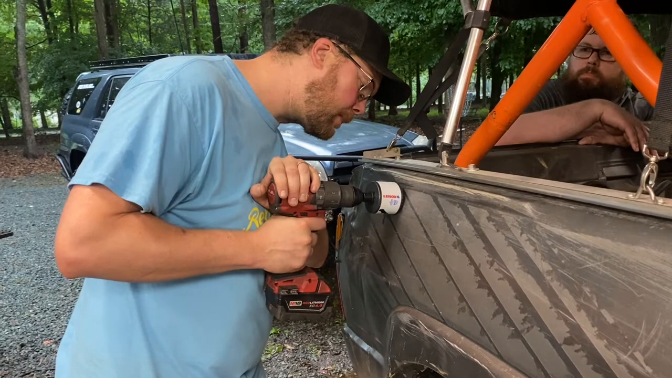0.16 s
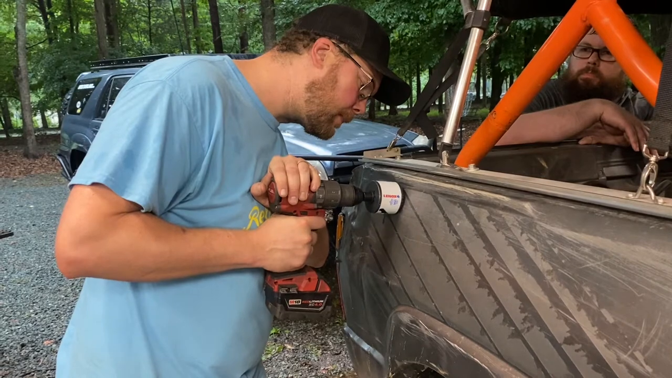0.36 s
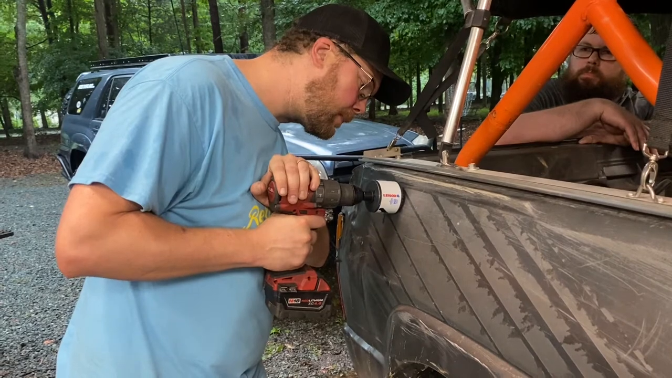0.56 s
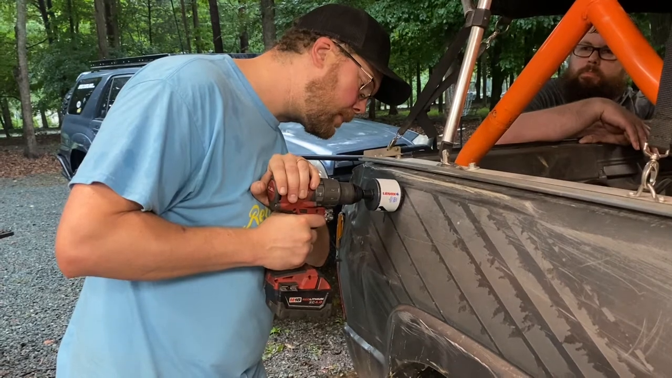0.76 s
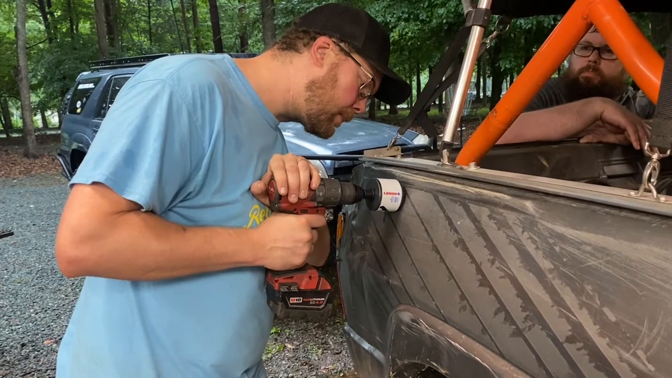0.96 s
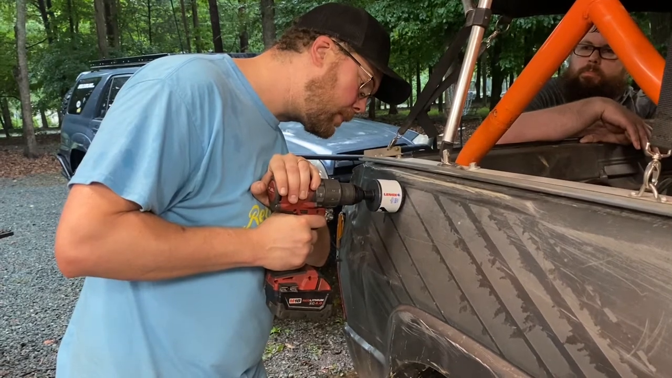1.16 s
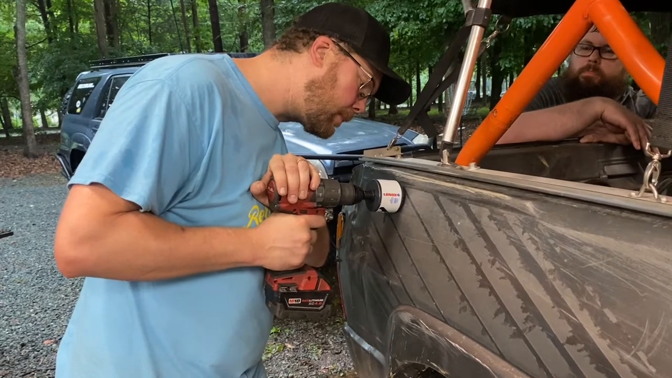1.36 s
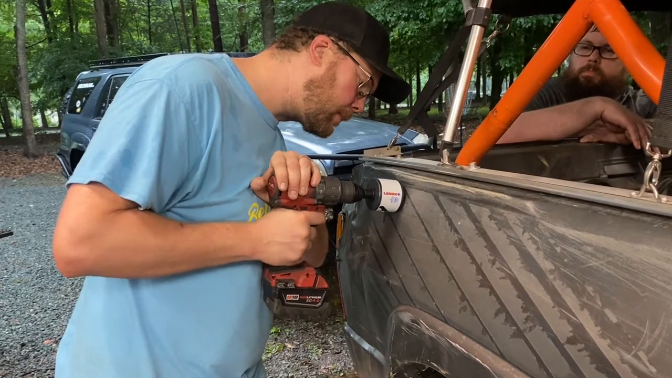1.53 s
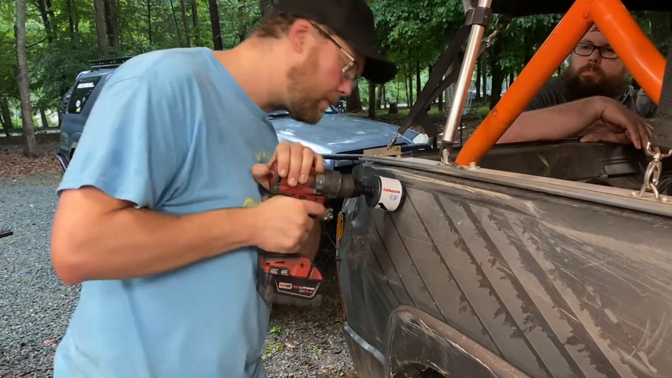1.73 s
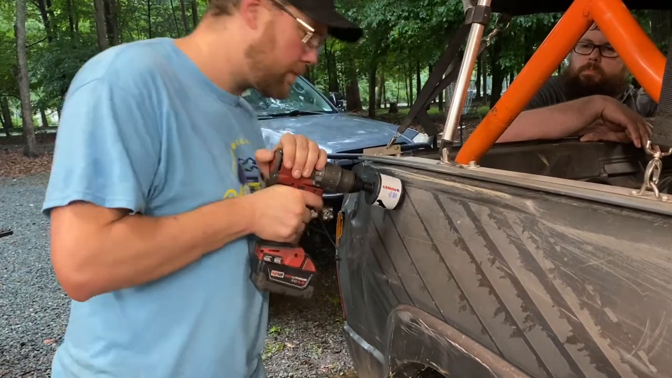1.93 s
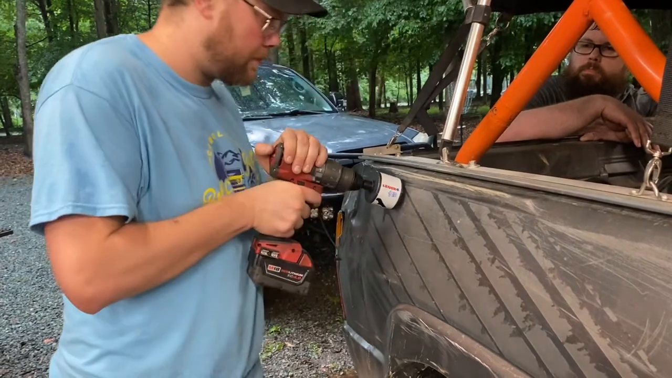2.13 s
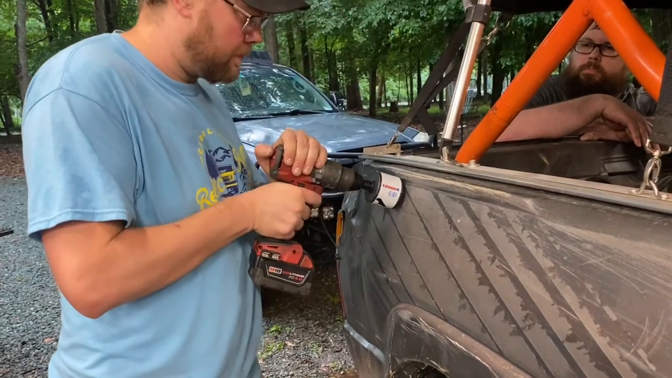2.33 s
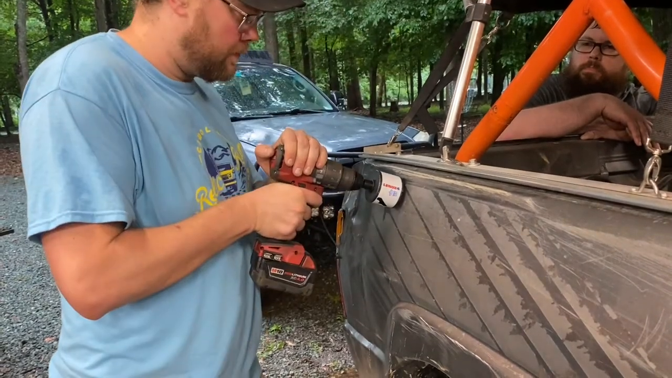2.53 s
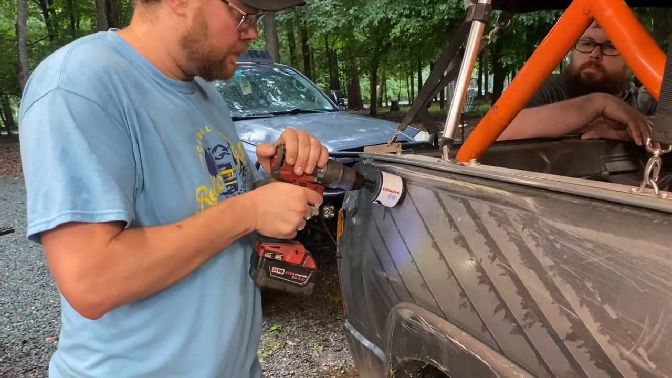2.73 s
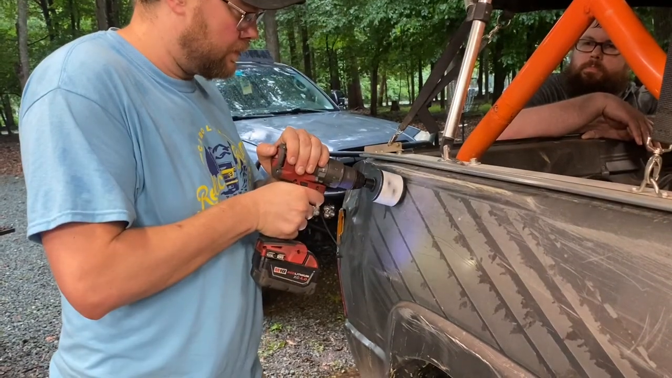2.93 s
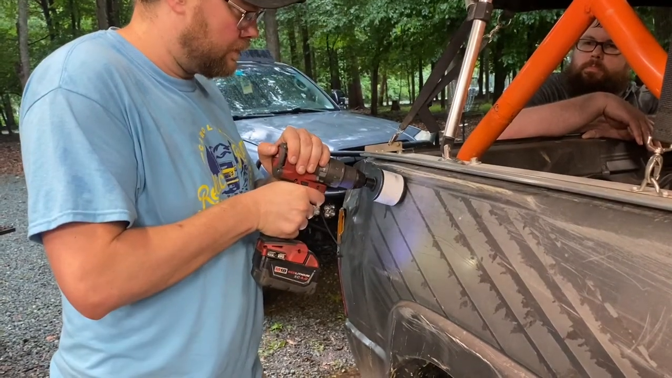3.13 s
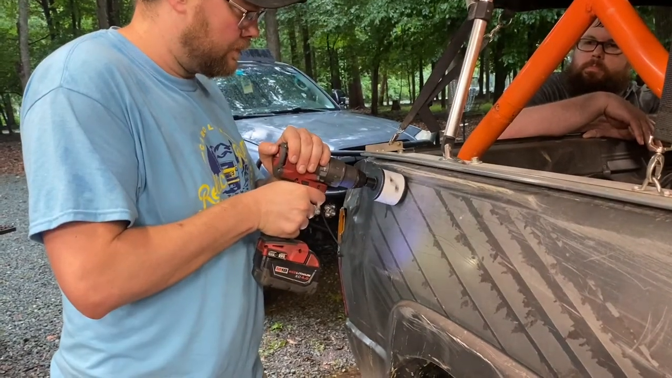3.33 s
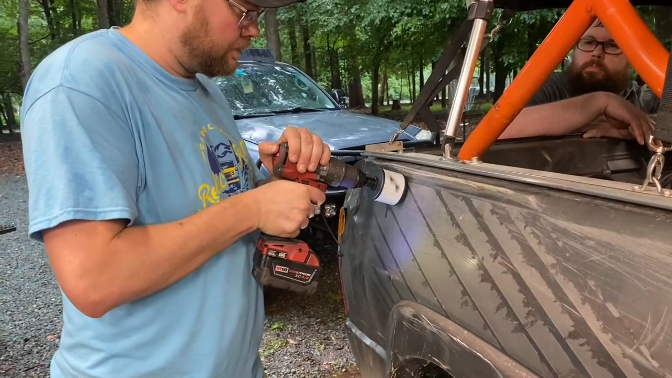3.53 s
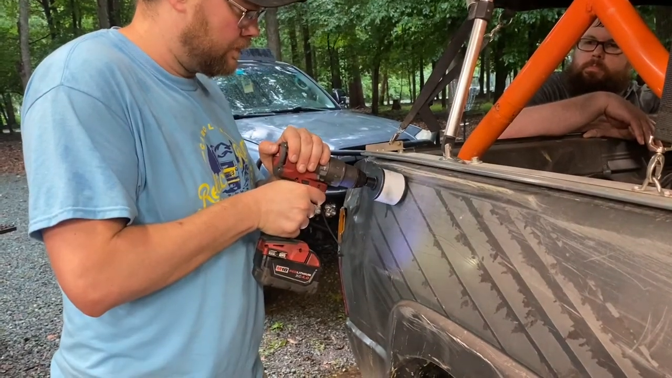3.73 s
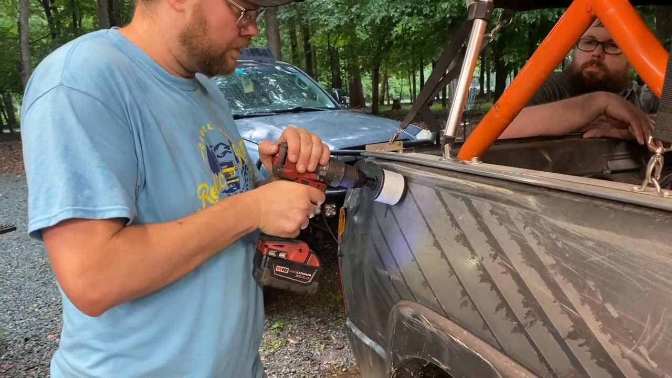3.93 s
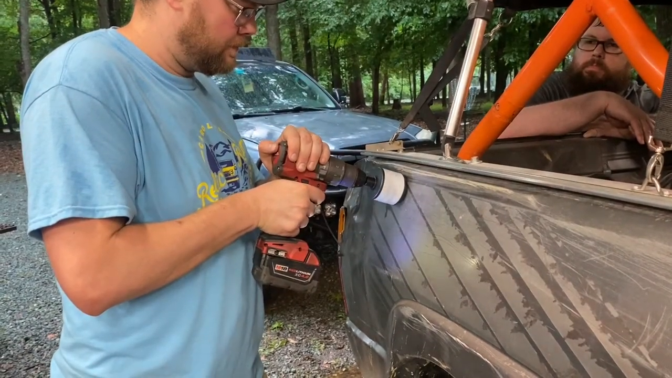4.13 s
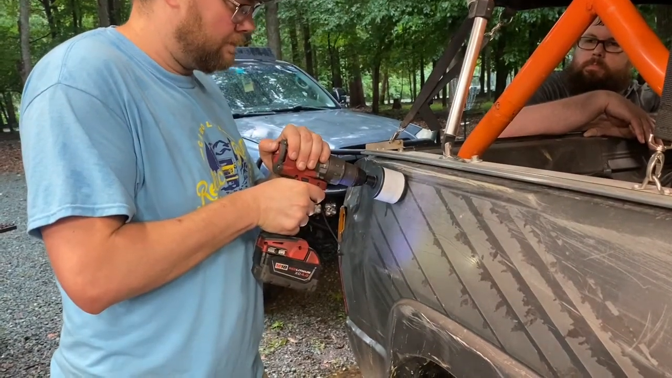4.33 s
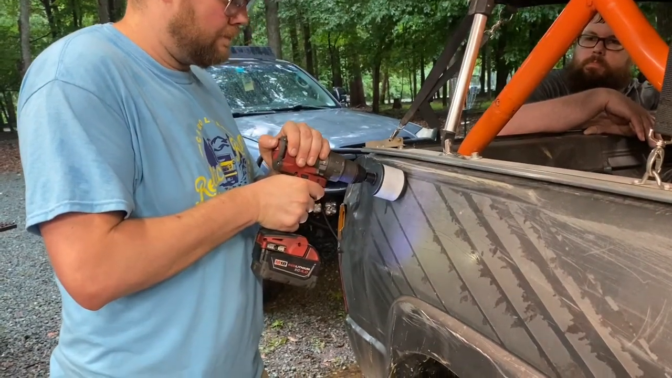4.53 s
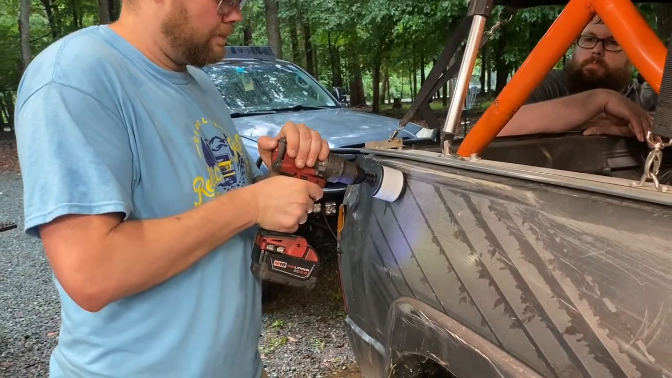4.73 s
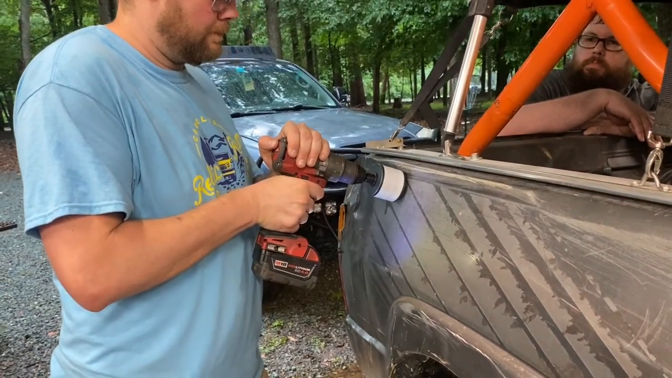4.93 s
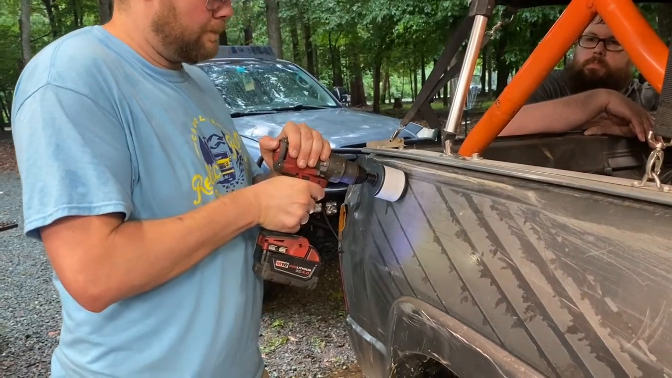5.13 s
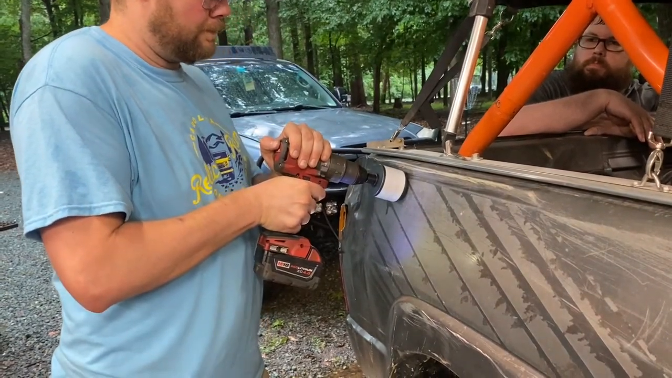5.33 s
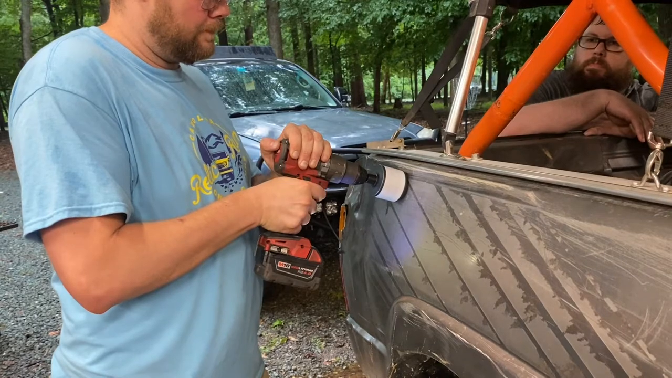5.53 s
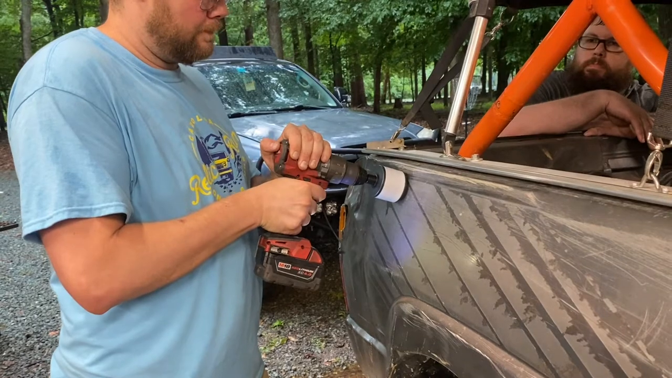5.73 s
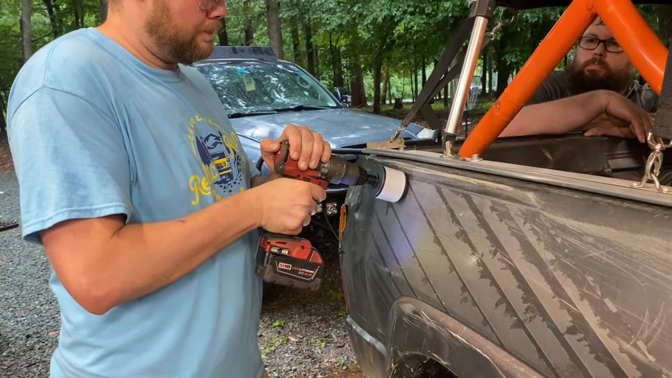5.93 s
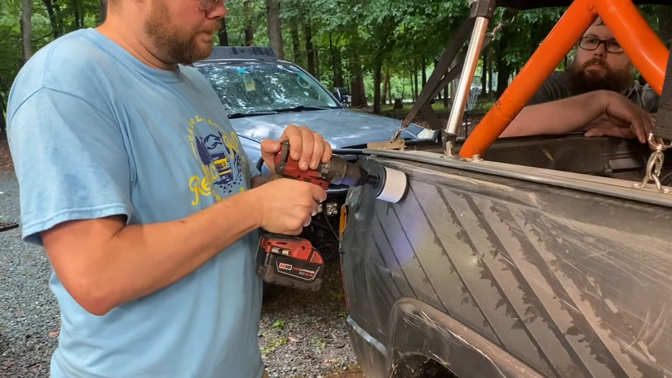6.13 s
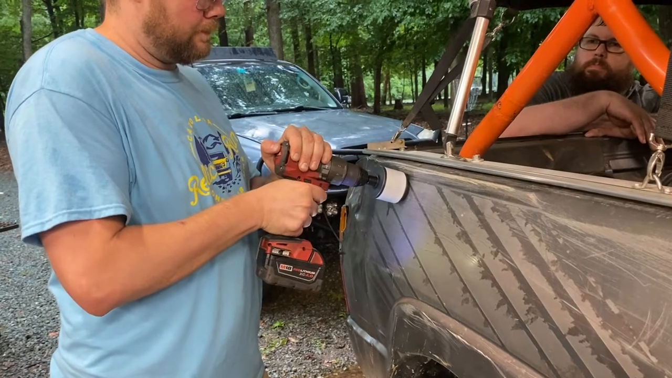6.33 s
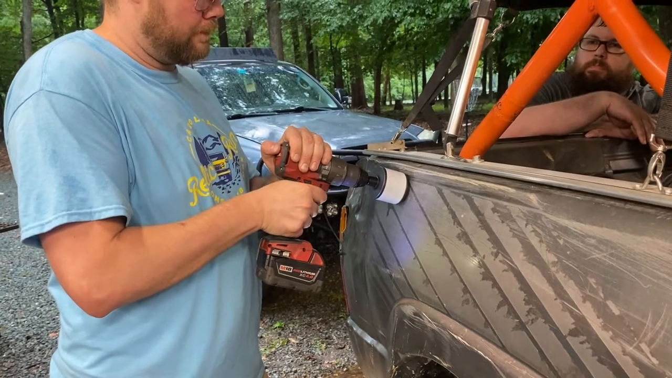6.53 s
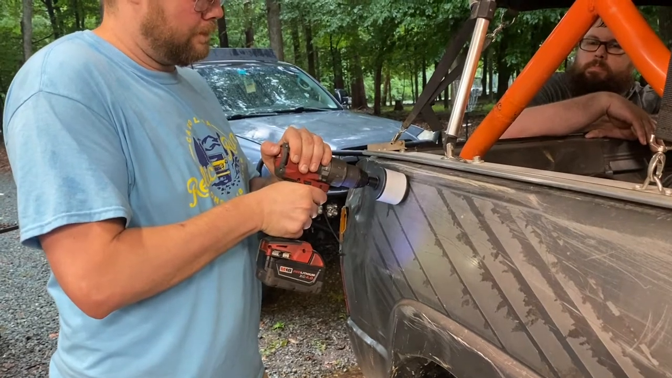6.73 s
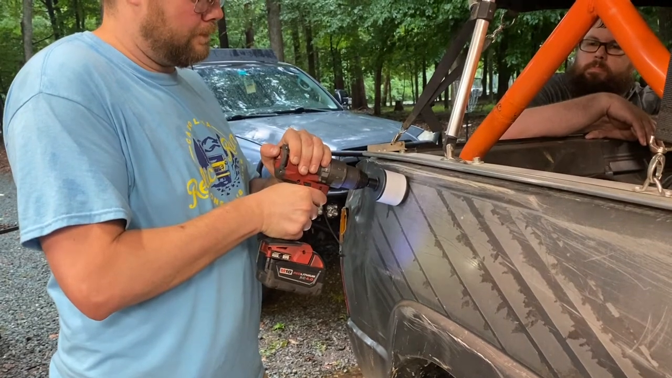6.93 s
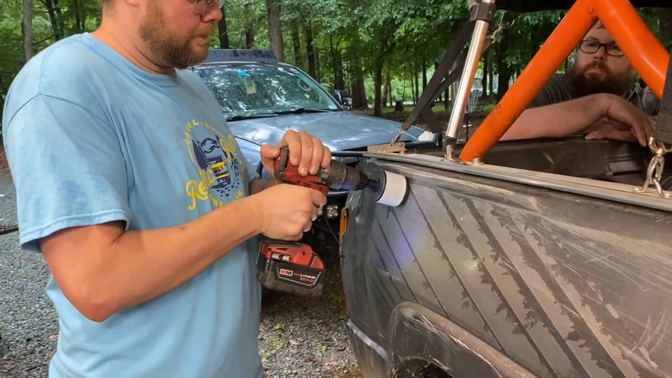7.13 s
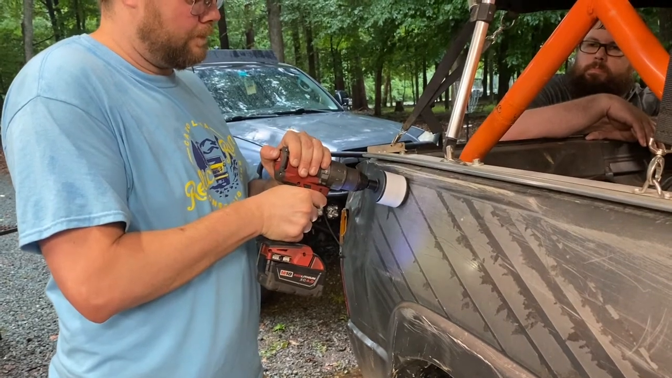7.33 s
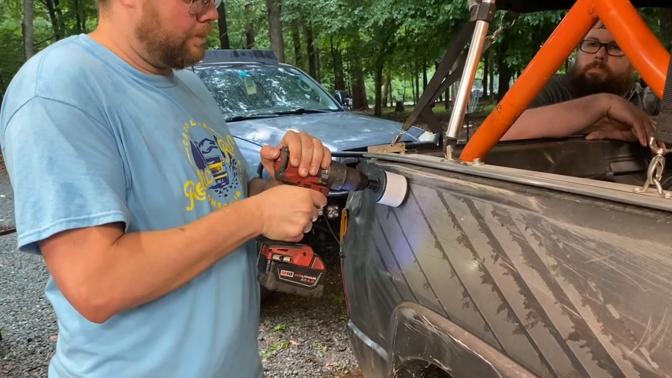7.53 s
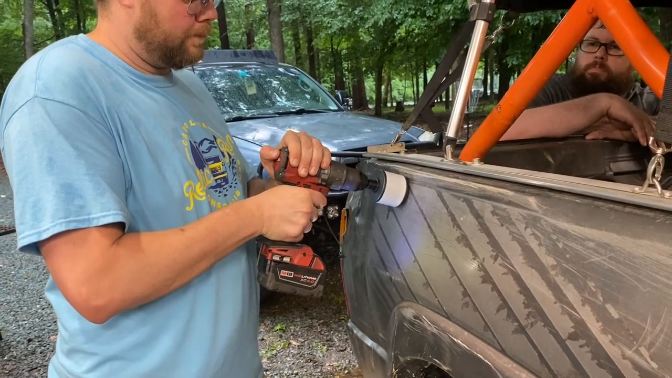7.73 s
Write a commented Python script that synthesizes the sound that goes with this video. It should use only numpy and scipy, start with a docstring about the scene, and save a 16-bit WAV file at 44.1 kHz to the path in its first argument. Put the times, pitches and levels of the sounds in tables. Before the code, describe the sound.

Outdoors, a low machine rumble runs alone, then a cordless drill's hole saw knocks, grinds and speeds into a loud ringing chatter through sheet steel.

```python
"""Outdoors beside a vehicle: a cordless drill drives a hole saw into a steel side panel, a metre or two from a
phone. The teeth knock one by one while the spindle is slow, then skip and chatter at full speed. Tooth blows
excite the panel's damped modes; tearing metal and chips excite the saw cup; gear tones whine in ratio to the
spindle. A low machine rumble of coloured noise runs throughout; the background level drops once the drill is
under way."""
import sys
import numpy as np
from scipy import signal
from scipy.fft import rfft, irfft, next_fast_len
from scipy.io import wavfile
from scipy.ndimage import uniform_filter1d

SR = 44100
rng = np.random.default_rng(int(sys.argv[2]) if len(sys.argv) > 2 else 0)


def to_linear_factor(level_db):
    """Convert decibel levels (scalar or array-like) to linear amplitude factors."""
    exponent = np.asarray(level_db, float) / 20
    return 10 ** exponent


def wav_record(signal):
    """Record a signal, one row per channel, as 16-bit PCM in the file named by sys.argv[1]."""
    frames = np.transpose(np.atleast_2d(signal))
    bounded = np.clip(frames, -1, 1)
    # unit amplitude maps onto the largest positive 16-bit level
    quanta = np.round(bounded * 32767).astype(np.int16)
    wavfile.write(sys.argv[1], SR, quanta)


N = 342657
TIME, SIZE = np.arange(N) / SR, next_fast_len(N + SR)
HZ = np.fft.rfftfreq(SIZE, 1 / SR) + 1e-3  # kept off zero for the logarithms and divisions
TEETH = 12
# the cup seats in its groove around this time
SEATS_S, SEAT_LENGTH_S = 5.38, 0.17


def unit(x):
    """Normalisation to an rms of 1."""
    return x / np.sqrt(np.mean(x ** 2))


def over_hz(table):
    """Spectral envelope: interpolates (pitch_hz, value) rows on a log-frequency axis."""
    hz, value = np.transpose(table)
    return np.interp(np.log(HZ), np.log(np.maximum(hz, 1)), value)


def modes(table):
    """Modal superposition: sums damped resonators, neighbours in opposite phase."""
    response = 0
    for k, (hz, width_hz, level_db) in enumerate(table):
        damping = 1j * width_hz * HZ
        response = response + (-1) ** k * to_linear_factor(level_db) * damping / (hz ** 2 - HZ ** 2 + damping)
    return response


def through(x, response):
    """Linear filtering: multiplies the spectrum by a frequency response."""
    return irfft(rfft(x, SIZE) * response, SIZE)[..., :N]


def clicks(start_s, size):
    """Impulsive excitation: one weighted sample at each time."""
    return np.bincount(np.clip((start_s * SR).astype(int), 0, N - 1), size, N)


def decaying(x, decay_s):
    """Exponential relaxation: each input sample dies away with this time constant."""
    return signal.lfilter([1], [1, -np.exp(-1 / (decay_s * SR))], x)


def walk(rate):
    """Slow random modulation: normal levels held 1 / rate s, then smoothed twice."""
    k = int(SR / rate)
    held = np.repeat(rng.standard_normal(N // k + 1), k)
    return uniform_filter1d(uniform_filter1d(held, k), k)[:N]


def bump(peak_s, before_s, after_s):
    """Bell envelope of height 1, with its own rise and fall."""
    return np.exp(-((TIME - peak_s) / np.where(TIME < peak_s, before_s, after_s)) ** 2)


# broad colour of the rumble: pitch_hz, relative level_db
RUMBLE_COLOUR = [(30, -11), (64, 1.5), (138, -4), (180, -5.5), (436, -6.5), (968, -9.5), (1380, -17),
                 (6000, -32), (8200, -40), (11000, -44), (16000, -52)]
# humps on that colour: pitch_hz, width_hz, level_db over the colour
HUMS = [(64.9, 4.2, 9.8), (78, 2.5, 1.3), (132.8, 4.4, 11.3), (439.8, 2, 14.7)]
# stereo width of the rumble: pitch_hz, side minus mid level_db
WIDTH = [(60, -17.5), (300, -7), (1300, -1), (3900, -4.5), (5500, 0), (6800, -33)]
# band that comes in uneven puffs: pitch_hz, width_hz, level_db under the rest of the rumble
PUFF = [(307, 31, -16)]


def rumble():
    """Broadband noise: a running machine some way off, with a few humps and nearly mono bass."""
    level_db, sink_db, sink_from_s, sink_to_s = -29.5, -15.5, 2.8, 5.2
    left_minus_right_db, puff_swing_db = -0.6, 8.5
    colour = to_linear_factor(over_hz(RUMBLE_COLOUR)) * (1 + np.abs(modes(HUMS)))
    shapes = colour * np.array([HZ ** 0, to_linear_factor(over_hz(WIDTH))])
    mid, side = through(rng.standard_normal((2, N)), shapes)
    sinking_db = np.interp(TIME, (sink_from_s, sink_to_s), (0, sink_db))
    gain = to_linear_factor(level_db + sinking_db + 0.5 * walk(7.9)) / np.std(mid)
    puff_noise = unit(through(rng.standard_normal(N), modes(PUFF) ** 2))
    puffs = to_linear_factor(PUFF[0][2] + puff_swing_db * walk(9.0)) * puff_noise
    mid = mid + np.std(mid) * puffs
    pan = to_linear_factor(left_minus_right_db / 2)
    return gain * np.array([(mid + side) * pan, (mid - side) / pan])


def knocks(table, response, decay_s):
    """Impact excitation: short noise bursts into a ringing body, each scaled to its peak."""
    burst = np.exp(-TIME / decay_s) * rng.standard_normal(N)
    blow = through(burst, response)[:SR // 4]
    start_s, peak_db = np.transpose(table)
    return signal.fftconvolve(clicks(start_s, to_linear_factor(peak_db)), blow / np.abs(blow).max())[:N]


# faint ticks before the drill starts: start_s, peak_db
TICKS = [(0.6679, -35), (1.4646, -40), (2.6174, -36)]


def ticks():
    """Impact noise: faint, short bursts with the colour of the cup's hiss."""
    return knocks(TICKS, to_linear_factor(over_hz(HISS)), 0.015)


# switching tones of the speed controller: pitch_hz, peak level_db before the throb
SWITCH = [(7830, -51), (15660, -57)]


def controller():
    """Amplitude modulation: the switching tones throb while the trigger is part pressed."""
    on_s, off_s = 2.608, 4.4
    gate = (TIME > on_s) & (TIME < off_s)
    throb = to_linear_factor(1.4 * walk(26.0))
    return gate * throb * sum(to_linear_factor(db) * np.sin(2 * np.pi * hz * TIME) for hz, db in SWITCH)


# gear and motor tones: multiple of spindle speed, rms level_db before the cup seats, level_db after
WHINE = [(6.11, -41, -31), (7.96, -39, -26), (16.09, -41.5, -37), (24.26, -39, -38.5),
         (32.08, -38.5, -40.5)]


def whine(tooth_hz, speed, cutting):
    """Order-locked tones: gears and motor sound at fixed multiples of the wavering spindle speed."""
    waver_share, waver_db = 0.0068, 2.5
    turns = np.cumsum(tooth_hz * (1 + waver_share * walk(25))) / SR / TEETH
    out = np.zeros(N)
    for multiple, *levels_db in WHINE:
        level_db = np.interp(TIME, (SEATS_S, SEATS_S + 2 * SEAT_LENGTH_S), levels_db)
        out += to_linear_factor(level_db + waver_db * walk(9)) * np.sin(2 * np.pi * multiple * turns)
    return np.sqrt(2) * out * speed ** 10 * cutting


# single teeth ping the cup: start_s, initial level_db, pitch_hz
PINGS = [(2.8826, -14, 7570), (2.9221, -14, 7585), (3.0145, -13, 7670), (3.0608, -9.5, 7600),
         (2.8617, -13, 11000), (3.2044, -18, 11190), (5.1156, -12, 11100), (5.3954, -17, 11150),
         (5.8484, -14, 10970), (4.1902, -17, 7850), (5.02, -10.5, 7920), (5.7874, -12, 7970),
         (5.9822, -13.5, 7660)]


def pings():
    """Free vibration: the struck cup rings in short decaying sines."""
    decay_s = 0.0032
    out, t = np.zeros(N + SR), TIME[:SR // 20]
    for start_s, level_db, pitch_hz in PINGS:
        ping = to_linear_factor(level_db) * np.exp(-t / decay_s) * np.sin(2 * np.pi * pitch_hz * t)
        out[int(start_s * SR):][:len(t)] += ping
    return out[:N]


# first blows as the slack is taken up: start_s, peak_db
CATCH = [(2.718, -8), (2.753, -7)]


def first_blows():
    """Impulse response of the steel: noisy blows excite panel, hole edge and cup together."""
    steel = modes(PANEL) / 2 + modes(BOOM) * to_linear_factor(4.5) + 2 * modes(EDGE)
    steel = steel + modes(CUP) * to_linear_factor(-12.5) + to_linear_factor(over_hz(SCRAPE) - 11.0)
    return knocks(CATCH, steel, 0.0093)


# the spindle hunts and climbs: start_s, tooth_rate_hz
CLIMB = [(2.74, 55.98), (2.78, 60.2), (2.832, 84.28), (2.868, 93.73), (2.916, 100.1), (3.056, 109.7),
         (3.112, 107), (3.206, 89.43), (3.47, 77.58), (3.588, 83.82), (3.718, 111.9), (3.936, 152.8),
         (4.08, 204.1), (4.308, 254.6), (4.51, 315.5), (4.6, 327.7)]
# then runs at full speed: start_s, tooth_rate_hz
FULL = [(4.68, 345.), (5.45, 345.), (5.75, 341.), (7.77, 339.)]
# skipping grows with speed: tooth_rate_hz, share of teeth that skip (0-1)
SKIP_BY_RATE = [(260, .02), (305, .12), (322, .3), (331, .9)]


def spindle():
    """Rotational kinematics: tooth rate, speed relative to the final speed, and share of skipping teeth."""
    tooth_hz = np.interp(TIME, *np.transpose(CLIMB + FULL))
    skip = np.interp(tooth_hz, *np.transpose(SKIP_BY_RATE))
    return tooth_hz, tooth_hz / tooth_hz[-1], skip


# uneven rim (run-out, tooth groups, alternate set): times a turn, swing_db (scaled by twice the skip share)
RIM = [(1, 0.5), (4, 1), (6, 1)]


def tooth_blows(tooth_hz, skip, cutting):
    """Periodic impact with jitter: one blow a tooth, and a decaying burst of tearing after each."""
    teeth = np.cumsum(tooth_hz * cutting) / SR
    k = np.arange(1, int(teeth[-1]))
    chance = rng.standard_normal((3, len(k)))
    slip = np.interp(k, teeth, skip)
    # a skipping saw lands off the beat, and the taller teeth take the load
    start_s = np.interp(k + (0.012 + 0.3 * slip) * chance[0], teeth, TIME)
    rim_db = sum(db * np.cos(2 * np.pi * order * k / TEETH) for order, db in RIM)
    bite = to_linear_factor(2 * slip * rim_db + (1.5 + 0.8 * slip) * chance[1])
    bite = bite / np.sqrt(uniform_filter1d(bite ** 2, size=4 * TEETH))
    # a missed tooth lets the panel spring back, so the mean push fades
    blows = -clicks(start_s, bite - slip) / np.sqrt(tooth_hz)
    tear = decaying(clicks(start_s, bite * to_linear_factor(2.0 * chance[2])) / np.sqrt(tooth_hz), 0.0025)
    return unit(blows), tear


# low panel modes: pitch_hz, width_hz, relative level_db
BOOM = [(137.8, 5.9, 5), (172.6, 21.7, 4.5), (205.2, 32.4, 8), (235.7, 5.3, -4.5), (263, 11.3, 2.5),
        (332, 7, 3)]
# the whole panel sways under steady bites: pitch_hz, width_hz, relative level_db
SWAY = [(78.2, 6.3, 1), (262, 253, -4), (730, 1500, -23)]


def panel_boom(blows, skip, rub, noise):
    """Forced plate vibration: blows and rubbing drive the low modes, which radiate little in the deep bass."""
    radiates_hz, seat_db = 118, -8.5
    force = blows + to_linear_factor(-6.0) * skip * rub * noise
    radiation = 1 + (radiates_hz / HZ) ** 8
    low, high = through(force, np.array([modes(BOOM[:4]), modes(BOOM[4:])]) / radiation)
    # the seated cup holds down the two highest low modes
    seated = to_linear_factor(seat_db * np.clip((TIME - SEATS_S) / SEAT_LENGTH_S + 0.5, 0, 1))
    sway = through((1 - skip) ** 2 * blows, modes(SWAY))
    return unit(low + seated * high + sway)


def cutting_grit(blows, tear, rub, skip, speed, noise):
    """Contact-time low-pass: lasting blows lose treble; tearing and rubbing noise add to them."""
    contact_s, clean_db, soften_db = 0.00036, 20.5, -6.5
    steady_rub_db, steady_tear_db, hiss_from_hz = 8, 2.5, 900
    # steady bites are cleaner blows than skipping ones; all soften as the saw speeds up
    contact = to_linear_factor(clean_db * (1 - skip)) * decaying(blows, contact_s) / (contact_s * SR)
    tearing = to_linear_factor(9.0 - steady_tear_db * (1 - skip)) * unit(tear * noise[0])
    rubbing = to_linear_factor(11.0 - steady_rub_db * (1 - skip)) * rub * noise[1]
    rough = tearing + rubbing
    # under steady bites the tearing and rubbing keep mostly to the treble
    deep = through(rough, 1 / (1 + (HZ / hiss_from_hz) ** 4))
    return to_linear_factor(soften_db * speed) * contact + rough - 0.7 * (1 - skip) * deep


# upper panel modes: pitch_hz, width_hz, relative level_db
PANEL = [(379.8, 9.7, 1), (534, 16, -5), (632.5, 29, 0.5), (709, 24.5, 1), (805, 11, -11), (912.3, 8.4, -1),
         (1660, 51, -4), (1860, 13.3, 9), (2131, 11.8, 5), (2445, 23, 2), (2725, 12.5, -2), (3525, 22, 0.5),
         (3947, 30, -6), (4880, 17.5, 4)]
# broad colour between the panel modes: pitch_hz, relative level_db per Hz
SCRAPE = [(300, -4.5), (600, 3.5), (1000, -2.5), (1500, 4.5), (2500, 0.5), (4500, -0.5), (6200, -8),
          (9000, -8.5)]
# slow teeth rasp through a wide band: pitch_hz, width_hz, level_db over the feed, before the speed fade
RASP = [(2530, 470, -5.5)]
# one panel mode sings as the speed settles: pitch_hz, width_hz, level_db over the feed at its peak
SING = [(1869, 41, -4)]


def panel_scrape(grit, speed):
    """Modal density: distinct upper modes stand over the diffuse ring of the sheet's many small ones."""
    sheet_t60_s, sheet_db = 0.13, -0.5
    tail = rng.standard_normal(SR // 2) * to_linear_factor(-60 * TIME[:SR // 2] / sheet_t60_s)
    sheet = rfft(unit(tail), SIZE) / np.sqrt(SR // 2)
    panel = modes(PANEL) + to_linear_factor(over_hz(SCRAPE) - 10.0) * (1 + to_linear_factor(sheet_db) * sheet)
    rasp = to_linear_factor(RASP[0][2]) * np.clip(1 - speed, 0, 1) * unit(through(grit, modes(RASP)))
    sing = to_linear_factor(SING[0][2]) * bump(4.666, 0.4, 0.64) * unit(through(grit, modes(SING)))
    return unit(through(grit, panel)) + rasp + sing


# the cut edge of the hole rings: pitch_hz, width_hz, relative level_db
EDGE = [(1130, 18, -6.5), (1206, 16.8, 3.5), (1236.4, 24, 3), (1320, 20, -1)]


def hole_edge(grit):
    """Free-edge resonance: the grit excites the rim of the cut."""
    return unit(through(grit, modes(EDGE)))


# the first bite screeches through a wide band: pitch_hz, width_hz, relative level_db
SCREECH_BAND = [(4040, 360, -5), (5040, 460, 5)]


def screech(grit):
    """Resonant band-pass: the grit sounds through a wide band and fades during the first bite."""
    on_s, off_s, edge_s, level_db, db_per_s = 2.855, 3.065, 0.0088, -24.5, -19
    held = np.clip(np.minimum(TIME - on_s, off_s - TIME) / edge_s, 0, 1)
    return held * to_linear_factor(level_db + db_per_s * (TIME - on_s)) * unit(through(grit, modes(SCREECH_BAND)))


# saw cup modes: pitch_hz, width_hz, relative level_db
CUP = [(7510, 390, -2), (8028, 113, 14), (7988, 320, 9.5), (10985, 81, 9), (11400, 240, 1.5),
       (12700, 1200, -1.5), (14750, 210, 5.5)]
# broad colour between the cup modes: pitch_hz, relative level_db per Hz
HISS = [(4000, -0.5), (6200, -12.5), (8000, 2.5), (12500, -8), (16000, -27)]


def cup_ring(tear, rub, noise):
    """Random excitation of shell modes: each family is struck by its own chips, 900 a second on average."""
    strength = to_linear_factor(5.74 * np.minimum(rng.exponential(size=(3, N)), 5))
    chips = (rng.random((3, N)) < 900 / SR) * strength * np.sign(noise[2])
    fizz = unit(tear * noise[1]) + rub * (to_linear_factor(-6.0) * noise[0] + to_linear_factor(3.5) * unit(chips))
    families = np.array([modes(CUP[:3]) + to_linear_factor(over_hz(HISS) - 8), -modes(CUP[3:5]), modes(CUP[5:])])
    return unit(through(fizz, families).sum(axis=0))


# the hand: start_s, feed level_db (sets the cutting), sideways lean level_db (flexes the panel)
HAND = [(2.741, -28, -22), (2.8, -25.5, -20.5), (3.061, -24.5, -19.5), (3.12, -26, -23), (3.45, -25, -25.5),
        (3.75, -23, -23), (3.87, -22, -20), (4.08, -19, -21.5), (4.2, -19.5, -22.5), (4.35, -17.5, -21.5),
        (4.46, -18.5, -22), (4.6, -24, -17), (4.8, -24, -21), (5.5, -27, -21.5), (5.65, -25, -17),
        (6.12, -25, -18), (6.4, -27, -22.5), (7.77, -28, -20.5)]
# the saw grabs (+) or slips free (-): peak_s, swing of the cup ring swing_db, length_s to either side
GRABS = [(2.778, 12.5, 0.014), (2.913, 9.5, 0.042), (3.042, 10.5, 0.021), (3.762, 4.5, 0.024),
         (4.601, -1, 0.36), (6.201, -5, 0.029)]


def drill():
    """Source superposition: hand force sets the levels of boom, edge, scrape and ring; whine is added."""
    start_s, *columns = np.transpose(HAND)
    feed_db, lean_db = (np.interp(TIME, start_s, column) for column in columns)
    grab_db = sum(db * bump(peak_s, length_s, length_s) for peak_s, db, length_s in GRABS)
    # each part takes its own share of a grab; the boom answers only the slips
    boom_db = lean_db + 0.97 * np.minimum(grab_db, 0)
    scrape_db = feed_db + 0.38 * grab_db
    # the ring gains 1.22 dB a second as the cup sinks in
    ring_db = feed_db + grab_db - 7 + 1.22 * (TIME - start_s[0])
    # the edge is choked while the saw runs up to full speed
    edge_db = feed_db + 0.49 * grab_db - 4.5 - 9 * bump(4.37, 0.38, 0.99)

    cutting = TIME > start_s[0]
    tooth_hz, speed, skip = spindle()
    blows, tear = tooth_blows(tooth_hz, skip, cutting)
    noise = rng.standard_normal((3, N))
    rub = cutting * to_linear_factor(2.3 * walk(22) + 2.0 * walk(60))
    grit = cutting_grit(blows, tear, rub, skip, speed, noise)

    boom = to_linear_factor(boom_db) * panel_boom(blows, skip, rub, noise[0])
    edge = to_linear_factor(edge_db) * hole_edge(grit)
    scrape = to_linear_factor(scrape_db) * panel_scrape(grit, speed)
    ring = to_linear_factor(ring_db) * cup_ring(tear, rub, noise)
    return boom + edge + scrape + ring + screech(grit) + whine(tooth_hz, speed, cutting)


# drill at the two microphone ports: pitch_hz, left minus right level_db of the direct sound
BALANCE = [(100, -.5), (380, -2.6), (2400, 2.2), (4400, 2.), (6500, 0.)]
# scattered sound of the drill: pitch_hz, scattered over direct level_db
SCATTER = [(100, -20.), (210, -18.), (320, -9.), (700, -5.), (1200, -3.), (3000, -5.), (3900, -7.),
           (5500, -5.), (6800, -30.)]


def ports(x):
    """Decorrelation by scattering: echoes off ground, panel and trees pull the two ports apart."""
    half = to_linear_factor(over_hz(BALANCE) / 2)
    tail = rng.standard_normal(SR // 2) * to_linear_factor(-60 * TIME[:SR // 2] / 0.25)  # t60 0.25 s
    apart = to_linear_factor(over_hz(SCATTER)) * rfft(tail / np.sqrt(np.sum(tail ** 2)), SIZE)
    return through(x, np.array([half * (1 + apart), (1 - apart) / half]))


def scene():
    """Linear superposition: drill, first blows, controller, pings and ticks at the phone, over the rumble."""
    near = drill() + first_blows() + ticks() + controller() + pings()
    return ports(near) + rumble()


def top_cut(x):
    """Nothing passes above the cut-off."""
    return signal.sosfilt(signal.butter(12, 16690, fs=SR, output="sos"), x)


def record(dry):
    """Group delay, band limits and saturation: left treble lags, deep bass and top are cut, peaks are rounded."""
    lag_from_hz, lag_s = 6850, 0.000227  # lag of left behind right
    turn = np.exp(-1j * np.pi * lag_s * np.maximum(HZ - lag_from_hz, 0))
    x = through(dry, np.array([turn, 1 / turn]))
    x = signal.sosfilt(signal.butter(6, 50, "high", fs=SR, output="sos"), x)
    x = signal.sosfilt(signal.ellip(8, 0.2, 40, 15900, fs=SR, output="sos"), x)
    x = np.tanh(1.1 * x) / 1.1
    return top_cut(x)


dry = scene()
out = record(dry)
wav_record(out)
```